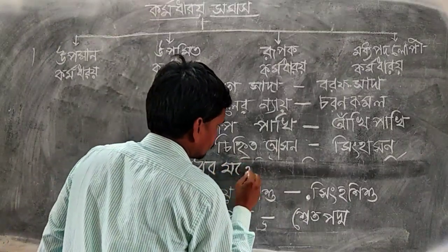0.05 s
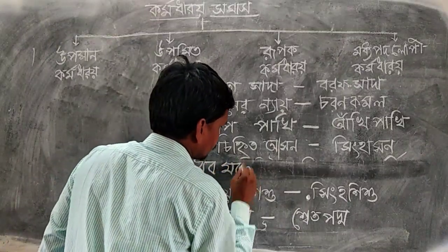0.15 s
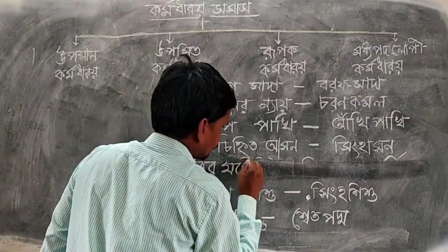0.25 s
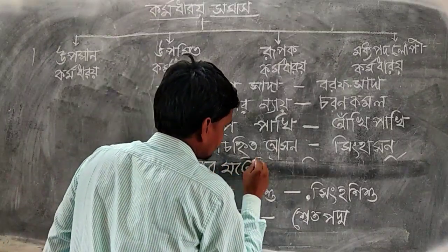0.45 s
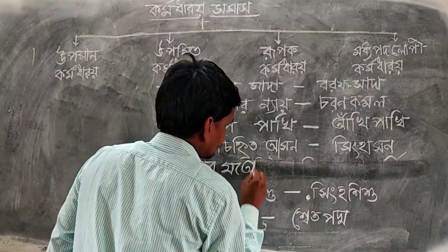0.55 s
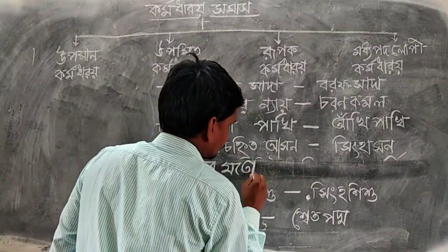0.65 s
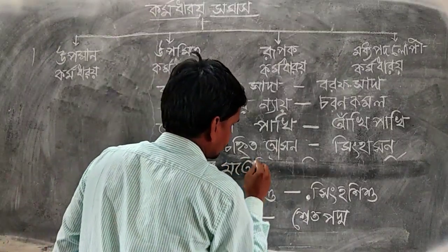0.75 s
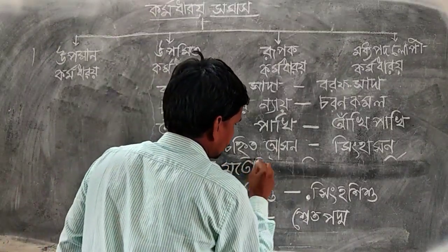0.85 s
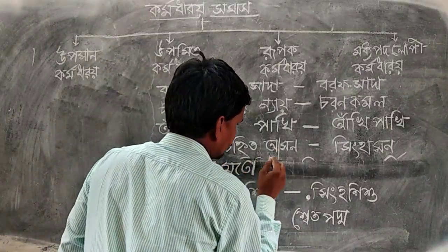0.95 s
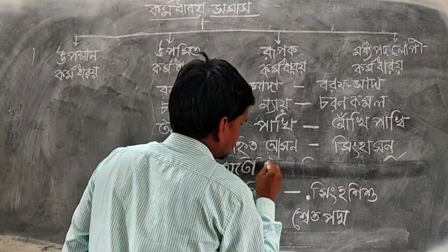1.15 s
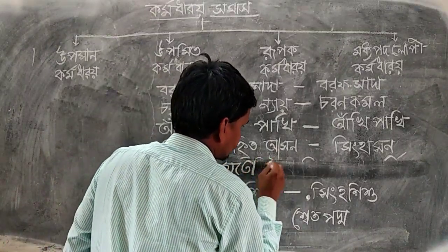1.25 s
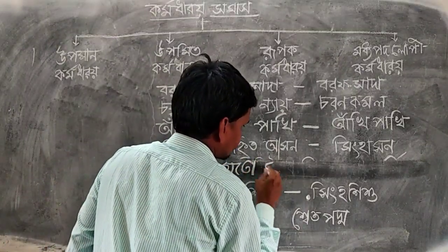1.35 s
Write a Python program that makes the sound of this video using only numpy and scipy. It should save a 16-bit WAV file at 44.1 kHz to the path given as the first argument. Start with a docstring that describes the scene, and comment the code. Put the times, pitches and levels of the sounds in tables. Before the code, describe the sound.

Chalk writes on a blackboard, starting with soft, grainy strokes. From about 0.2 to 0.3 seconds it catches in a loud, high, rising squeak that rings briefly in the bare classroom. Two more strokes follow, then a sharp, gritty tap near 0.9 seconds. From 1.1 to 1.4 seconds come three light strokes with a faint chirp and a dull scuff. A low room rumble and faint hiss continue throughout.

```python
"""Chalk writes on a blackboard in a bare, quiet classroom. Short strokes rub grains off the stick; the tip
chirps faintly, then catches in a rising stick-slip squeak that rings on in the room. After two more
strokes it lands again with a gritty tap. Last come three light strokes, a faint chirp and a dull scuff.
A low room rumble and a faint hiss run throughout."""
import sys
import numpy as np
from scipy import signal
from scipy.fft import rfft, irfft, next_fast_len
from scipy.io import wavfile
from scipy.ndimage import uniform_filter1d, map_coordinates

SR = 44100
rng = np.random.default_rng(int(sys.argv[2]) if len(sys.argv) > 2 else 0)


def pcm_store(signal):
    """Save signal as 16-bit PCM."""
    levels = np.round(np.clip(np.atleast_2d(signal), -1, 1) * 32767)
    wavfile.write(sys.argv[1], SR, levels.astype(np.int16).T)


N = 61739

# squeak contour: time_s, pitch_hz, level_db
SQUEAK_CONTOUR = [(.190, 3240, -57.5), (0.201, 3128, -35.5), (0.214, 3133, -21.5), (0.228, 3142, -30),
                  (.245, 3236, -21), (0.261, 3365, -19.5), (0.271, 3427, -18), (0.285, 3455, -23.5),
                  (0.299, 3523, -46)]
# harmonics 1-4: gain_db, roughness_ratio, skirt_hz
SQUEAK_HARMONICS = [(-0.5, 0.19, 86), (-7, 0.57, 140), (-8, 0.4, 180), (-27.5, .92, 180)]
def squeak(t, jitter_depth=0.0033, jitter_hz=252, rasp_db=-52):
    """The tip sticks and slips thousands of times a second, higher and louder as it is pushed."""
    time_s, pitch_hz, level_db = np.array(SQUEAK_CONTOUR).T
    pitch = np.interp(t, time_s, pitch_hz) * (1 + jitter_depth * wander(jitter_hz))
    phase = 2 * np.pi * np.cumsum(pitch) / SR
    tone = sum(undb(gain_db) * friction_tone(k * phase, roughness, skirt_hz)
               for k, (gain_db, roughness, skirt_hz) in enumerate(SQUEAK_HARMONICS, 1))
    rasp = undb(rasp_db) * grit(RUB_SPECTRUM)
    envelope = undb(np.interp(t, time_s, level_db)) * (t > time_s[0]) * (t < time_s[-1])
    return envelope * (tone + rasp)


def friction_tone(phase, roughness, skirt_hz):
    """One partial; uneven slips smear a share of it into a noise skirt."""
    hz = np.arange(N // 2 + 1) * SR / N
    lowpass = np.exp(-0.5 * (hz / skirt_hz) ** 2)
    a, b = (unit_rms(irfft(rfft(rng.standard_normal(N)) * lowpass, N)) for _ in range(2))
    skirt = (a * np.sin(phase) + b * np.cos(phase)) / np.sqrt(2)
    return np.sqrt(1 - roughness ** 2) * np.sin(phase) + roughness * skirt


# board response: freq_hz, gain_db
TAP_SPECTRUM = [(60, -46), (200, -38), (900, -16), (1500, -21.5), (2500, 1.5), (3600, 8), (5000, -10.5),
                (7000, 12.5), (10000, -23), (15000, -24)]
def tap(start_s=0.8648, impulse_db=-5.5):
    """One hard knock of the stick on the board."""
    impulse = np.zeros(N)
    impulse[int(start_s * SR)] = -undb(impulse_db)
    return colour(impulse, TAP_SPECTRUM)


# crumbling bursts: start_s, level_db, decay_s
CRUNCH_BURSTS = [(0.852, -47.5, 0.012), (0.858, -37.5, 0.011), (.869, -35.5, 0.0034), (0.875, -38, 0.0075)]
# crumbling chalk: freq_hz, gain_db
CRUNCH_SPECTRUM = [(100, -61.5), (500, -36), (1500, -18.5), (2800, -15.5), (4400, -9.5), (5700, -1),
                   (7000, 2), (8200, -9.5), (10500, -8), (12000, -6.5), (13500, -17), (14900, -7)]
def crunch(t):
    """The landing tip crumbles in a few quick bursts."""
    force = sum(undb(level_db) * (t >= start_s) * np.exp(-np.maximum(t - start_s, 0) / decay_s)
                for start_s, level_db, decay_s in CRUNCH_BURSTS)
    return force * grit(CRUNCH_SPECTRUM)


# chalk strokes: start_s, length_s, level_db, tilt_db_per_octave
RUB_STROKES = [(0.033, 0.11, -53, 3.5), (0.131, 0.12, -58, -4.5), (0.306, 0.054, -52.5, -1),
               (0.537, 0.1, -46.5, 8), (1.093, 0.054, -63.5, 9), (1.187, 0.12, -53.5, 6),
               (1.312, 0.11, -56, 2)]
# rubbing chalk: freq_hz, gain_db
RUB_SPECTRUM = [(300, -28.5), (1500, -11.5), (3000, -2), (4500, -8), (6500, 3.5), (8500, -0.5),
                (11000, -3.5), (13500, -15), (15500, -2)]
def strokes(t):
    """Chalk rubs off on the board in short strokes."""
    rubbing = np.zeros(N)
    for start_s, length_s, level_db, tilt in RUB_STROKES:
        spectrum = [(hz, db + tilt * np.log2(hz)) for hz, db in RUB_SPECTRUM]
        rubbing += undb(level_db) * pressure(t, start_s, length_s) * grit(spectrum)
    return rubbing


def pressure(t, start_s, length_s, attack_s=0.049, release_s=0.018):
    """A stroke presses on, holds and lets go."""
    attack = np.sin(np.pi / 2 * np.clip((t - start_s) / attack_s, 0, 1)) ** 2
    return attack * np.exp(-np.maximum(t - start_s - length_s, 0) / release_s)


def grit(spectrum, grains_per_s=5500, spread_db=3.5):
    """Chalk grains break off as dense clicks of uneven size."""
    hits = rng.random(N) < grains_per_s / SR
    size = np.minimum(rng.exponential(size=N), 3)
    clicks = hits * rng.choice([-1, 1], N) * undb(spread_db * size)
    return unit_rms(colour(clicks, spectrum))


# near-catches: start_s, length_s, pitch_hz, skirt_hz, level_db
TIP_CHIRPS = [(0.156, 0.057, 3410, 350, -58), (1.223, 0.059, 3510, 120, -54.5)]
def chirps(t, roughness=0.97):
    """The tip almost catches: weak, rough tones."""
    tones = np.zeros(N)
    for start_s, length_s, pitch_hz, skirt_hz, level_db in TIP_CHIRPS:
        envelope = undb(level_db) * np.sin(np.pi * np.clip((t - start_s) / length_s, 0, 1))
        tones += envelope * friction_tone(2 * np.pi * pitch_hz * t, roughness, skirt_hz)
    return tones


# dull scrape: start_s, length_s, level_db
SCUFF_STROKE = (1.225, 0.086, -55.5)
# dull scrape: freq_hz, gain_db
SCUFF_SPECTRUM = [(150, -17), (280, -5.5), (380, 9), (560, -2), (750, -0.5), (1000, 1), (1250, 2),
                  (1500, 3), (1850, 1), (2300, -3), (4000, -1.5), (9000, -12.5)]
def scuff(t):
    """A soft, dull scrape as the hand moves on."""
    start_s, length_s, level_db = SCUFF_STROKE
    return undb(level_db) * pressure(t, start_s, length_s) * grit(SCUFF_SPECTRUM)


# reverberation: freq_hz, t60_s
CLASSROOM_DECAY = [(200, 0.46), (1500, 1), (3300, 0.83), (4600, .58), (6500, 0.57), (10000, 0.44),
                   (15000, 0.3)]
def classroom(t, tail_db=-1.5, build_s=0.00399, early_db=1.5, early_decay_s=0.014, echoes_per_s=2500):
    """Room response: close reflections from board and wall, then a tail whose treble dies first."""
    hz, time_s, spectra = signal.stft(rng.standard_normal((2, N)), SR, nperseg=256)
    decay = np.exp(-np.log(1000) * time_s / log_interp(CLASSROOM_DECAY, hz)[:, None])
    tail = signal.istft(spectra * decay, SR)[1][:, :N]
    tail = unit_rms(tail * (1 - np.exp(-t / build_s)))
    echoes = rng.standard_normal((2, N)) * (rng.random((2, N)) < echoes_per_s / SR)
    early = unit_rms(echoes * np.exp(-t / early_decay_s))
    return (undb(tail_db) * tail + undb(early_db) * early) / np.sqrt(N)


# low swells: centre_s, length_s, level_db
RUMBLE_SWELLS = [(0.064, 0.25, -62), (0.366, 0.075, -64), (.975, 0.13, -67), (1.164, 0.14, -71.5)]
# low swells: freq_hz, gain_db
SWELL_SPECTRUM = [(50, -21.5), (110, -3), (160, 3.5), (240, -7.5), (450, -10.5), (900, -28)]
def swells(t):
    """The low rumble swells softly a few times."""
    envelope = sum(undb(level_db) * np.cos(np.pi * np.clip((t - centre_s) / length_s, -0.5, 0.5))
                   for centre_s, length_s, level_db in RUMBLE_SWELLS)
    return envelope * noise(SWELL_SPECTRUM)


# room rumble: freq_hz, gain_db
RUMBLE_SPECTRUM = [(25, -17), (48, -12.5), (65, -1), (95, -7.5), (130, 4.5), (200, -2), (350, -1.5),
                   (520, -4.5), (720, -10.5), (1400, -12), (2500, -12.5), (3500, -36.5)]
def rumble(mid_db=-67, side_bass_db=-8, split_hz=730, waver_db=1):
    """Low, slightly wavering room rumble, alike on both sides in the bass."""
    mid, side = noise(RUMBLE_SPECTRUM), noise(RUMBLE_SPECTRUM)
    side = colour(side, [(split_hz / 2, side_bass_db), (split_hz * 0.94, 0)])
    return undb(mid_db + waver_db * wander(rate_hz=10)) * np.array([mid + side, mid - side])


# background hiss: freq_hz, gain_db
HISS_SPECTRUM = [(1200, -19), (2500, 1), (4500, -7), (7000, -6.5), (11000, -9.5), (15500, -11.5)]
def hiss(level_db=-69.5):
    """Faint steady hiss, independent on each side."""
    return undb(level_db) * noise(HISS_SPECTRUM, (2, N))


def noise(spectrum, shape=N):
    """Coloured noise, rms 1."""
    return unit_rms(colour(rng.standard_normal(shape), spectrum))


def wander(rate_hz):
    """Smooth random drift, rms 1."""
    width = max(int(SR / rate_hz), 1)
    return unit_rms(uniform_filter1d(uniform_filter1d(rng.standard_normal(N), width), width))


def colour(x, spectrum):
    """Minimum-phase filter through (freq_hz, gain_db) points."""
    half = next_fast_len(N // 2 + SR // 20, real=True)
    gain = undb(log_interp(spectrum, np.linspace(0, SR / 2, half + 1)))
    cepstrum = irfft(np.log(gain))
    cepstrum[1:half] *= 2
    cepstrum[half + 1:] = 0
    return irfft(rfft(x, 2 * half) * np.exp(rfft(cepstrum)))[..., :N]


def log_interp(points, hz):
    """Read (freq_hz, value) points on a log-frequency axis."""
    freq_hz, values = np.array(points, float).T
    return np.interp(np.log(np.maximum(hz, 1)), np.log(freq_hz), values)


def undb(db):
    """Decibels to gain."""
    return 10 ** (np.asarray(db) / 20)


def unit_rms(x):
    """Scale to rms 1."""
    return x / np.sqrt(np.mean(x ** 2))


# stereo balance: freq_hz, left_minus_right_db
PORT_BALANCE = [(500, -1), (1500, -0.5), (3300, -1), (6500, -4), (10000, 3.5), (14000, 2.5)]
def scene(crunch_send_db=2, tap_send_db=-5, right_extra_path_m=0.0087):
    """All chalk sounds reach the two microphone ports directly and through the room."""
    t = np.arange(N) / SR
    writing = squeak(t) + chirps(t) + strokes(t) + scuff(t)
    crumbs, knock = crunch(t), tap()
    send = writing + undb(crunch_send_db) * crumbs + undb(tap_send_db) * knock
    reverb = signal.fftconvolve(send[None], classroom(t), axes=1)[:, :N]
    direct = writing + crumbs + knock
    delayed = map_coordinates(direct, [(t - right_extra_path_m / 343) * SR], order=5)
    left, right = (np.array([direct, delayed]) + reverb) / np.sqrt(2)
    left = colour(left, [(hz, db / 2) for hz, db in PORT_BALANCE])
    right = colour(right, [(hz, -db / 2) for hz, db in PORT_BALANCE])
    return np.array([left, right]) + rumble() + hiss() + swells(t)


def record(dry, cutoff_hz=15350):
    """A steep low-pass cuts the top treble."""
    return signal.sosfilt(signal.ellip(8, 0.2, 80, cutoff_hz, fs=SR, output="sos"), dry)


dry = scene()
out = record(dry)
pcm_store(out)
```